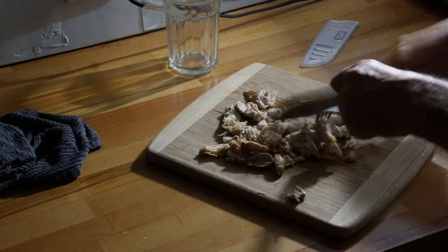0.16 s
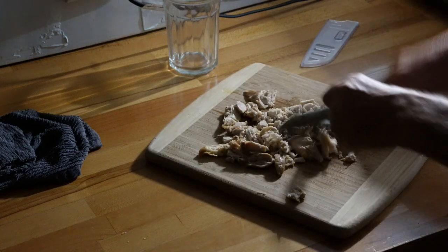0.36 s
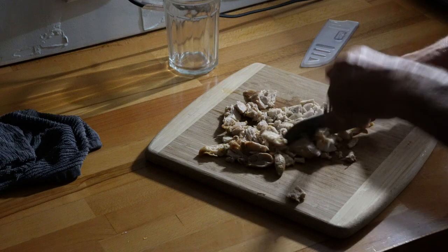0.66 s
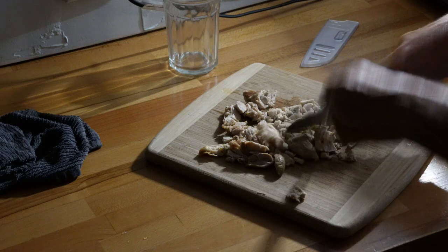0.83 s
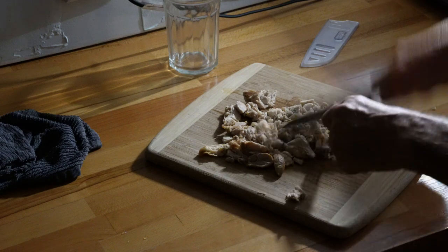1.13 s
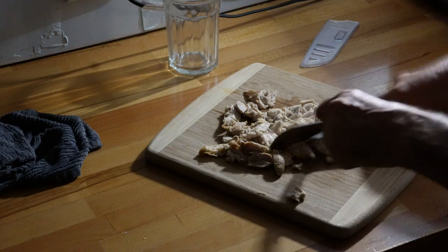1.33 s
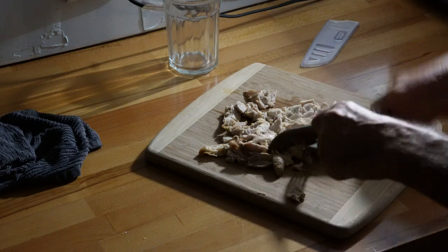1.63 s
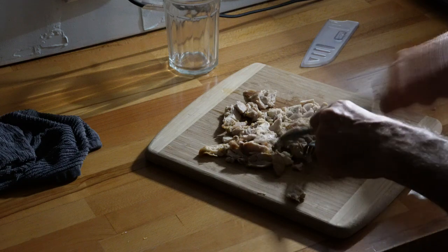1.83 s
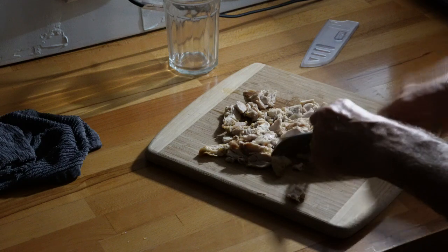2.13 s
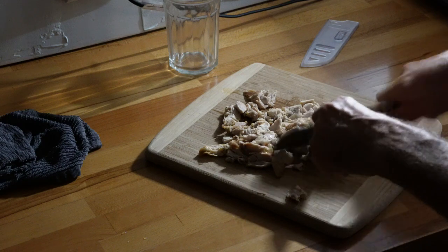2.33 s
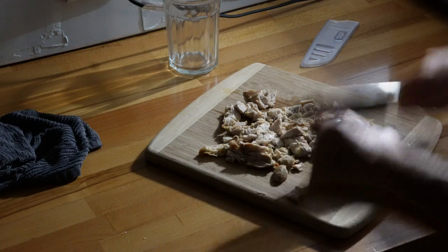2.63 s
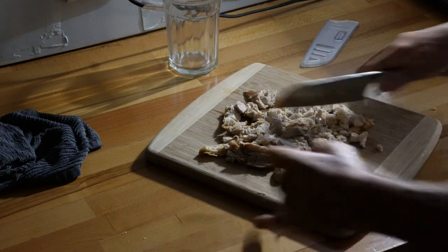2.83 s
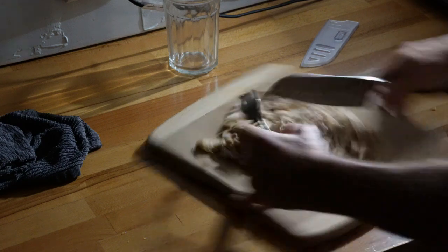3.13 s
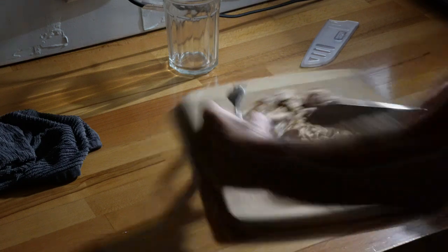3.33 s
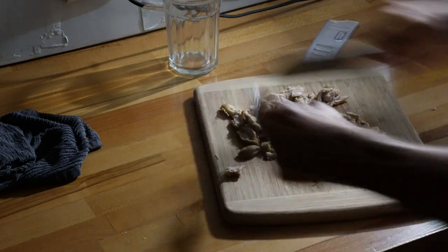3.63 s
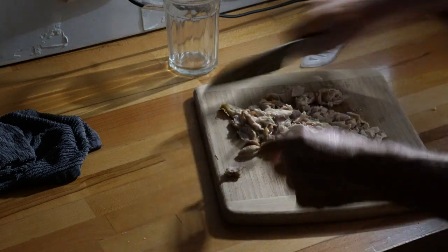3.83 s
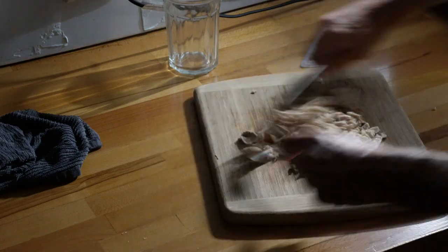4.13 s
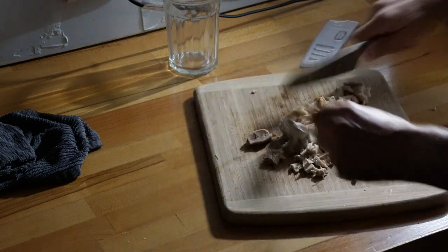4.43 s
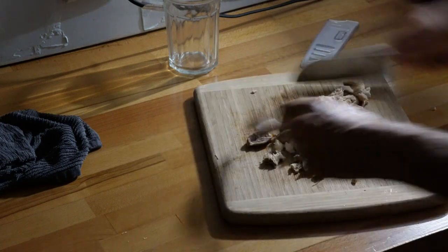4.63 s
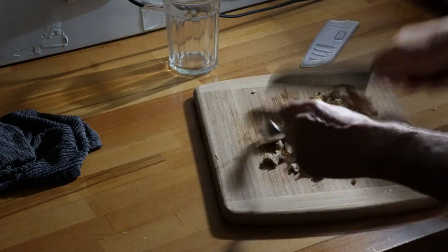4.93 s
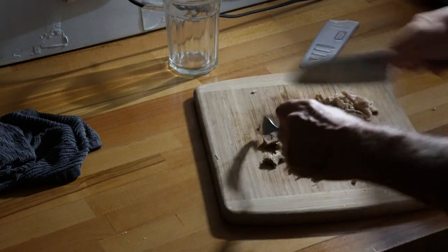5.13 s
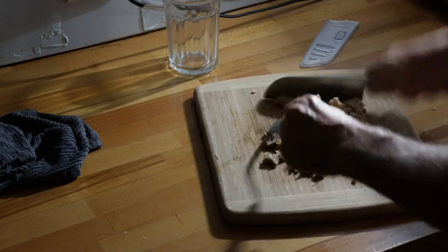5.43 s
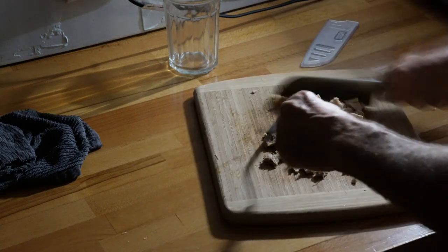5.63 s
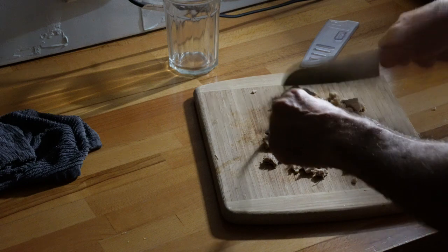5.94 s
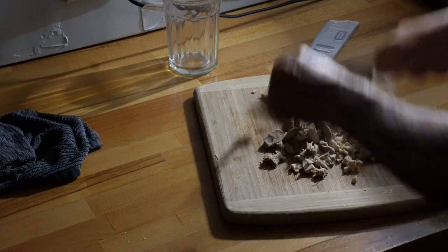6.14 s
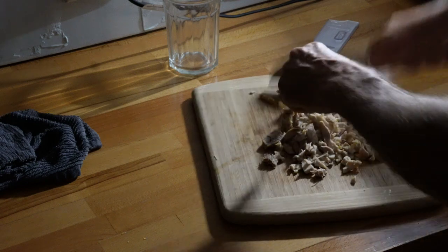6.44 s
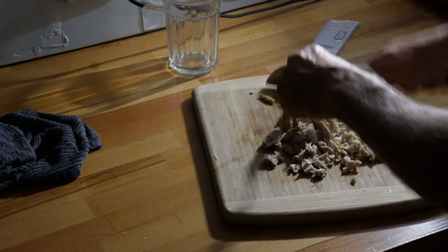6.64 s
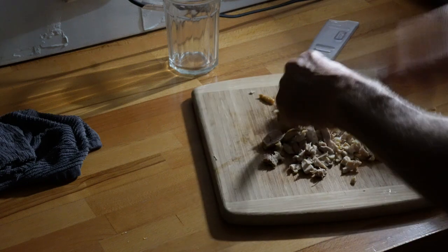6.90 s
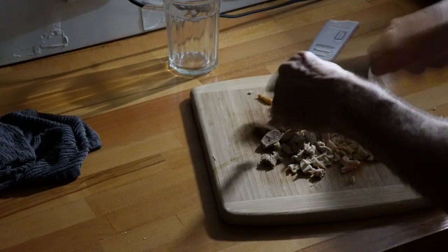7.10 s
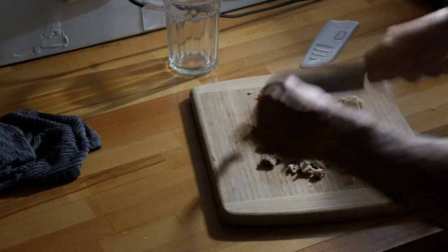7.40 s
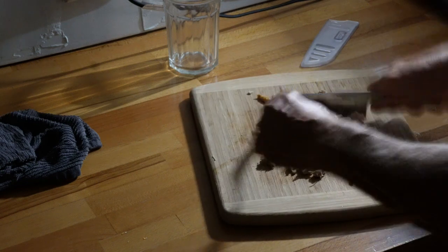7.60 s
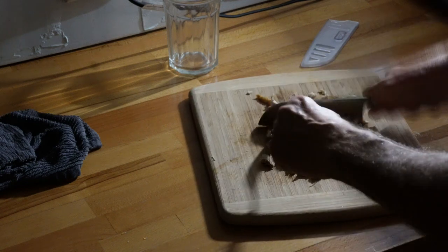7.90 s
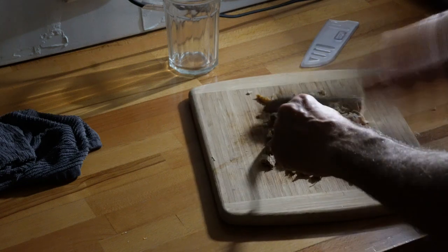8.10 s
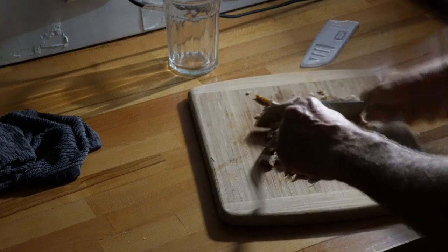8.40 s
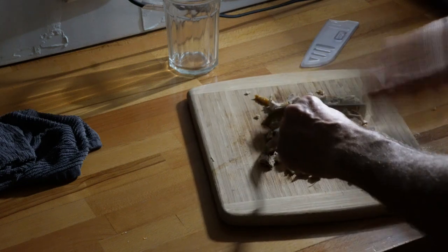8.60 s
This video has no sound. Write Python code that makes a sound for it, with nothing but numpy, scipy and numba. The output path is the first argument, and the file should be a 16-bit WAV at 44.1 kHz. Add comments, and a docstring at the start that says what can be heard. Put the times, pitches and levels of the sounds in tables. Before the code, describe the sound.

Close in a hard-walled kitchen with a low steady hum, a knife cuts cooked meat on a wooden board. One firm knock and a bright fork clink lead to soft, wet cuts. The board slides briefly, the blade scrapes with a thin metallic ring, and strokes resume unevenly. It finishes with a run of hard, regular woody chops, each with a counter thud and a short room echo.

```python
"""In a hard-walled kitchen with a humming appliance, a knife chops cooked chicken held by a fork on a wooden board.
Strokes knock the board (damped modes, noise bursts), thud into the counter and tear moist fibres (random snaps).
Early on, blade and fork clink; then the board slides round and the edge scrapes meat together (stick-slip).
A run of hard, even chops ends it. A close recorder's limiter squeezes loud blows, so the room swells behind."""
import sys
import numpy as np
from scipy import signal
from scipy.fft import rfft, irfft
from scipy.io import wavfile
from scipy.ndimage import uniform_filter1d, minimum_filter1d
from numba import njit

SR = 44100
rng = np.random.default_rng(int(sys.argv[2]) if len(sys.argv) > 2 else 0)


def dump_mix(stems):
    """Bounce the given channels to the path in sys.argv[1] as a 16-bit WAV at rate SR."""
    frames = np.atleast_2d(stems).T  # one column per channel
    limited = np.clip(frames, -1, 1)  # hard clip at full scale
    pcm = np.round(limited * 32767).astype(np.int16)
    wavfile.write(sys.argv[1], SR, pcm)


N = 386316
T = np.arange(N) / SR
HIT = T[:SR // 4]  # time axis of one contact, s
LEFT_RIGHT = np.array([[1], [-1]])

# Knife strokes. Each row: start in seconds, reference level of the board knock in dB, level of the edge's
# crack on bare wood in dB, level of tearing meat in dB, time until the fibres part in seconds.
STROKES = [(.181, -10.5, -25.5, -36, .032), (.838, -57, -57, -32, 0.062), (1.196, -44, -68, -36, .052),
           (1.525, -29.5, -43.5, -36.5, 0.041), (1.803, -49, -63, -37, .047),
           (2.069, -31.5, -46, -36.5, .033), (2.332, -16, -31.5, -55, 0.025),
           (3.850, -25.5, -18, -47, 0.047), (4.610, -19.5, -15, -41, .025), (5.153, -32, -58, -30, 0.14),
           (5.501, -25.5, -31.5, -32, 0.12), (5.893, -29, -36, -31, 0.046), (6.216, -11, -3.5, -46, 0.065),
           (6.5129, -8, -4.5, -49, 0.039), (6.823, -8, -19.5, -30, .048), (7.132, -4.5, -14, -35, 0.053),
           (7.439, -8, -20.5, -27, 0.036), (7.740, -4.5, -19, -28, 0.045), (8.028, -6.5, -25.5, -28, 0.04),
           (8.309, -6, -20, -35, 0.036), (8.586, -4, -20, -31.5, 0.04)]
# Stereo width of diffuse sound. Each row: frequency in Hz, side-to-mid level in dB.
SIDE_TO_MID = [(30, -18), (70, -37), (130, -60), (250, -28.5), (600, -17), (1400, -15), (3000, -9),
               (8000, -2.5), (14000, 1)]

CLING_HZ = 25  # meat clinging to the steel widens the modes of blade and fork
LEAD_S = 0.1  # fibres() peaks this long after its start
SMACK_RISE_S, SMACK_FALL_S, SMACK_TILT_DB_PER_OCT = 0.0023, 0.011, 3.5


def undb(db):
    """Decibels to gain."""
    return 10 ** (np.asarray(db) / 20)


def unit(x):
    """Scale to rms 1."""
    return x / np.sqrt(np.mean(x ** 2))


def blow(x, db):
    """Set the level that a blow would have with all its energy in 10 ms."""
    return x * undb(db) / np.sqrt(np.sum(x ** 2) / (SR / 100))


def add(track, start_s, x):
    """Mix x into the track from start_s on."""
    i = max(int(start_s * SR), 0)
    track[i:i + len(x)] += x[:max(N - i, 0)]


def read(points, hz):
    """Interpolate a table over log frequency."""
    table_hz, value = np.transpose(points)
    return np.interp(np.log(hz + 1), np.log(table_hz), value)


def colour(x, points, tilt_db_per_oct=0, size=8192):
    """Minimum-phase filter with the given dB spectrum, tilted per octave."""
    hz = np.arange(size // 2 + 1) * SR / size
    spectrum_db = read(points, hz) + tilt_db_per_oct * np.log2(1 + hz / 1000)
    # folding the cepstrum onto positive time makes the filter causal
    cepstrum = irfft(np.log(undb(spectrum_db)))
    cepstrum[1:size // 2] *= 2
    cepstrum[size // 2 + 1:] = 0
    impulse = irfft(np.exp(rfft(cepstrum)))
    return signal.oaconvolve(x, impulse)[:len(x)]


def ring(modes, tilt_db_per_oct=0, scatter_db=0, detune=0):
    """Damped modes after one push; their sizes depend on the point of contact."""
    hz, width_hz, db = np.transpose(modes)[:, :, None]
    size, shift = rng.standard_normal((2, len(modes), 1))
    mode_db = db + tilt_db_per_oct * np.log2(hz / hz[0]) + scatter_db * size
    gain = undb(mode_db) * np.sqrt(width_hz)
    sign = (-1) ** np.arange(len(modes))[:, None]
    decay = np.exp(-np.pi * width_hz * HIT)
    tone = np.sin(2 * np.pi * hz * (1 + detune * shift) * HIT)
    return np.sum(sign * gain * decay * tone, axis=0)


def burst(rise_s, fall_s):
    """Rough contact: micro-impacts that build and die within milliseconds and favour no pitch."""
    shape = (1 - np.exp(-HIT / rise_s)) * np.exp(-HIT / fall_s)
    spray = rng.standard_normal(len(HIT)) * shape
    for _ in range(3):
        # flatten the spectrum, then restore the shape in time
        flat = irfft(np.exp(1j * np.angle(rfft(spray))), len(HIT))
        spray = flat * np.sqrt(shape)
    return spray


def grains(n, rate_hz, spread_db):
    """Tiny slips and snaps at random moments, of widely varied size, at rms 1."""
    size = undb(spread_db * np.minimum(rng.exponential(size=n), 4))
    present = rng.random(n) < rate_hz / SR
    return unit(present * size * rng.standard_normal(n))


def flicker(n, rate_hz):
    """Random wander between normal-distributed knots, spread near 1."""
    knots = np.arange(n) * rate_hz / SR
    return np.interp(knots, np.arange(200), rng.standard_normal(200))


def push(t, length_s, attack_s, press_db, release_s):
    """Gain of a sliding push from t = 0: takes hold, grows by press_db over its length, lets go."""
    hold = 1 - np.exp(-np.maximum(t, 0) / attack_s)
    press = undb(press_db * np.minimum(t / length_s - 1, 0))
    release = np.exp(-np.maximum(t - length_s, 0) / release_s)
    return hold * press * release


def fibres(db, rise_s, fall_s, tilt_db_per_oct):
    """Moist fibres snap ever harder up to a peak at LEAD_S, then let go."""
    # Spectrum of tearing meat. Each row: frequency in Hz, level in dB before tilt.
    meat_spectrum = [(200, -7), (800, 8.5), (2000, 6.5), (4000, 2), (6500, 0.5), (8500, -5), (12000, -8),
                     (16000, -15)]
    t = HIT - LEAD_S
    snaps = grains(len(t), rate_hz=6000, spread_db=2.5)
    crackle = unit(colour(snaps, meat_spectrum, tilt_db_per_oct))
    return undb(db) * crackle * np.exp(np.minimum(t / rise_s, -t / fall_s))


def background():
    """Motor hum, its partials unsteady in phase, over diffuse air noise."""
    # Appliance hum. Each row: frequency in Hz, rms level in dB before a common 1 dB cut.
    hum_partials = [(59.2, -51.5), (118.4, -47.5), (172.3, -48), (231.5, -49), (290.7, -55.5),
                    (328.4, -65.5), (829.0, -60.5)]
    # Room air noise. Each row: frequency in Hz, relative density in dB per Hz.
    air_spectrum = [(15, -27), (25, -33), (49, -2.5), (123, -5.5), (145, -3), (217, -3.5), (263, -7.5),
                    (335, -9), (416, -14.5), (714, -23.5), (796, -18), (1160, -25.5), (1480, -24.5),
                    (8590, -43), (16000, -62)]
    mid, side = (unit(colour(rng.standard_normal(N), air_spectrum)) for _ in range(2))
    hum = 0
    for hz, db in hum_partials:
        wander = np.cumsum(rng.standard_normal(N)) / np.sqrt(SR)
        phase = 2 * np.pi * (hz * T + rng.random()) + 1.07 * wander
        hum = hum + undb(db - 1) * np.sqrt(2) * np.sin(phase)
    air_db = -38.5
    return hum + undb(air_db) * (mid + LEFT_RIGHT * colour(side, SIDE_TO_MID))


def kitchen(x, room_db, gap_s, build_s):
    """Direct sound and dense wall and counter echoes; bass lasts longest, treble is widest."""
    # Reverberation. Each row: frequency in Hz, 60 dB decay time in seconds.
    room_decay = [(150, 1), (500, 0.63), (1000, 0.6968), (1900, 0.84), (3000, 0.66), (5000, 0.74),
                  (8000, .5), (13000, 0.61)]
    t = T[:SR]
    hz = np.arange(SR // 2 + 1.)
    octave = np.log2(np.clip(hz, 125, 16000) / 125)
    noise, tail = rfft(rng.standard_normal((2, SR))), 0
    for k in np.arange(8):
        t60_s = read(room_decay, 125 * 2 ** k)
        band = irfft(noise * np.maximum(1 - abs(octave - k), 0), SR)
        tail = tail + band * np.exp(-np.log(1000) * t / t60_s)
    onset = 1 - np.exp(-np.maximum(t - gap_s, 0) / build_s)
    mid, side = undb(room_db) * tail * onset / np.sqrt(np.sum(tail[0] ** 2))
    mid[0] += 1  # the direct path
    # even out narrow peaks and dips of the echo, so the board's own modes set the pitch
    power = abs(rfft(mid)) ** 2
    ripple_db = 10 * np.log10(uniform_filter1d(power, size=30) / uniform_filter1d(power, size=1500))
    even_mid = colour(mid, np.column_stack([hz + 1, -ripple_db]))
    response = even_mid + LEFT_RIGHT * colour(side, SIDE_TO_MID)
    return signal.fftconvolve(x[None], response, axes=1)[:, :N]


def board_turn():
    """The board slides softly over the counter in one push, catching on crumbs."""
    # Spectrum of the sliding board. Each row: frequency in Hz, level in dB.
    slide_spectrum = [(200, -13), (1000, -0.5), (2500, 3), (6500, -3), (9000, -15.5), (15000, -30)]
    rub = grains(N, rate_hz=4000, spread_db=-0.5) * undb(2.9 * flicker(N, rate_hz=17))
    pressure = push(T - 2.996, length_s=0.27, attack_s=0.022, press_db=6, release_s=0.045)
    return undb(-44.5) * unit(colour(rub, slide_spectrum)) * pressure


def clinks():
    """Steel grazes steel and rings the fork, which the meat soon damps."""
    # Fork modes. Each row: frequency in Hz, width in Hz before clinging meat, level in dB before tilt.
    fork_modes = [(1900, 160, -9.5), (2620, 110, -9.5), (3394, 100, -2), (3505, 53, -2), (3760, 41, -4),
                  (4120, 110, -6), (4750, 150, -19), (7130, 26, 2), (7370, 150, -3.5), (7900, 27, -1),
                  (8800, 74, -4), (9860, 150, -8), (11400, 25, -4.5), (11100, 140, -27), (13700, 130, -24),
                  (15100, 90, -23)]
    # Blade on fork. Each row: start in seconds, graze level in dB, tilt in dB per octave.
    fork_contacts = [(.4745, -25, -2.5), (.509, -33, -1), (.529, -34, 3), (6.645, -42.5, 4)]
    # graze spectrum: Hz, dB before tilt
    graze_spectrum = [(500, -28), (1700, -2), (3700, -1.0), (7000, 4.5), (16000, 0.5)]
    damped_fork = np.add(fork_modes, [0, CLING_HZ, 0])
    out = np.zeros(N)
    for start_s, db, tilt_db_per_oct in fork_contacts:
        contact = burst(rise_s=0.002, fall_s=0.007)
        graze = colour(contact, graze_spectrum, tilt_db_per_oct)
        fork = ring(damped_fork, tilt_db_per_oct)
        add(out, start_s, blow(fork, db + 2) + blow(graze, db))
    return out


def scrapes():
    """The edge sticks and slips over the wood grain and sets the blade singing: tip first, then heel."""
    # Pushes of the edge. Each row: start in seconds, length in seconds, friction level in dB,
    # steel ring level in dB (both before the push gain), contact from tip 0 to heel 1.
    edge_pushes = [(3.856, 0.12, -39, -29, 0.068), (3.998, .12, -39.5, -32, 0.042),
                   (4.61, 0.019, -28, -38, 1), (4.675, 0.092, -28.5, -27.5, 0.7)]
    # Blade modes. Each row: frequency in Hz, width in Hz before clinging meat, level in dB on the tip,
    # level in dB on the heel.
    blade_modes = [(2730, 110, -1, -27), (3257, 27, 2, 1.5), (3435, 90, 0, -10), (4100, 130, -5, -5),
                   (4773, 71, -2.5, 7), (5920, 84, 1, -7), (7150, 380, -2, -9), (8730, 680, -0.5, -11),
                   (9930, 59, -8, -6), (10680, 77, -9, -8), (11860, 44, -11, 4), (12900, 130, -11, -12),
                   (13500, 1500, -20, -6), (14300, 200, -17, -10), (15400, 220, -18, -22)]
    # Spectrum of the scraping edge. Each row: frequency in Hz, level in dB.
    edge_spectrum = [(100, -2), (400, 6.5), (1000, 8.5), (3000, -1.5), (5000, -6.5), (7000, -6),
                     (9000, -20), (16000, -17)]
    out = np.zeros(N)
    hz, width_hz, tip_db, heel_db = np.transpose(blade_modes)
    for start_s, length_s, friction_db, steel_db, heel in edge_pushes:
        slips = grains(len(HIT), rate_hz=3000, spread_db=3) * undb(2.5 * flicker(len(HIT), rate_hz=90))
        mode_db = tip_db + heel * (heel_db - tip_db)
        steel = 0
        for mode in np.column_stack([hz, width_hz + CLING_HZ, mode_db]):
            # as the contact point travels, each mode is driven now more, now less
            drive = undb(4 * flicker(len(HIT), rate_hz=30))
            steel = steel + signal.fftconvolve(slips * drive, ring([mode]))[:len(HIT)]
        pressure = push(HIT, length_s, attack_s=0.0026, press_db=5.5, release_s=0.011)
        friction = undb(friction_db) * unit(colour(slips, edge_spectrum))
        add(out, start_s, pressure * (friction + undb(steel_db) * unit(steel)))
    return out


def meat():
    """Steel smacks the wet surface, then tears through; now and then meat peels off the steel."""
    # Sticky meat leaving the steel. Each row: time of the peak in seconds, level in dB.
    peel_events = [(1.378, -55), (1.42, -52), (1.466, -48), (2.518, -56), (5.913, -42)]
    out = np.zeros(N)
    for start_s, knock_db, crack_db, tear_db, cut_s in STROKES:
        smack_db = -41.5 + 0.18 * max(knock_db, crack_db)
        smack = fibres(smack_db, SMACK_RISE_S, SMACK_FALL_S, SMACK_TILT_DB_PER_OCT)
        add(out, start_s - LEAD_S, smack)
        # the slower the cut, the longer the tear
        tear = fibres(tear_db, rise_s=0.16 * cut_s, fall_s=0.16 * cut_s, tilt_db_per_oct=-1)
        add(out, start_s + cut_s - LEAD_S, tear)
    for peak_s, db in peel_events:
        peel = fibres(db, SMACK_RISE_S, SMACK_FALL_S, SMACK_TILT_DB_PER_OCT)
        add(out, peak_s - LEAD_S, peel)
    return out


def chops():
    """The edge cracks on the wood, the board rings and the counter thuds below it."""
    # Board modes, which change with its lie on the counter. Each row: frequency in Hz, width in Hz,
    # level in dB before the board is turned, level in dB after; levels before tilt.
    board_modes = [(390, 70, -25, -29), (484.5, 25, -8, -3.5), (534.4, 25, -7.5, -3.5), (666, 17, -18, -19),
                   (718, 7.8, -10, -2.5), (803, 34, -2.5, 0.5), (853, 47, -2, -4), (995.3, 24.4, 0, 1.5),
                   (1180, 130, -2, -7), (1240, 170, -1.5, -11), (1325, 200, -9, -11.5),
                   (1442, 270, -14.5, -11.5), (1920, 52, -22, -8), (1935, 31, -16.5, -3),
                   (2080, 240, -39, -10.5)]
    # Spectrum of the wood's dense modes. Each row: frequency in Hz, level in dB before tilt.
    wood_spectrum = [(200, -16), (450, -7.5), (700, 0), (850, 6.5), (1100, 3), (1400, -5), (2100, -9.5),
                     (2800, -31.5), (3500, -20.5), (4600, -23.5), (5500, -35.5), (7500, -41.5),
                     (10000, -46), (16000, -66)]
    # Spectrum of the crack. Each row: frequency in Hz, level in dB.
    crack_spectrum = [(100, -57), (300, -2.5), (450, 0.5), (600, -21.5), (770, 2.5), (1150, -2.5),
                      (1700, 1.5), (2900, 1), (3300, -11.5), (4200, -8.5), (5000, -15), (7200, -19),
                      (9000, -32.5), (16000, -45)]
    # Spectrum of the counter thud. Each row: frequency in Hz, level in dB.
    thud_spectrum = [(25, -49), (50, -24), (90, -26), (130, -6), (190, -1), (290, -11), (420, -7.5),
                     (700, -28.5), (2000, -61)]
    turned_s = 3.5
    out = np.zeros(N)
    hz, width_hz, before_db, after_db = np.transpose(board_modes)
    for start_s, knock_db, crack_db, tear_db, cut_s in STROKES:
        force_db = max(knock_db, crack_db)
        bareness_db = crack_db - knock_db
        thud_db = -17.5 + 0.5 * force_db
        # the knock brightens with force and with bare contact
        tilt_db_per_oct = 4.0 + 0.079 * force_db + 0.2 * bareness_db
        modes = np.column_stack([hz, width_hz, after_db if start_s > turned_s else before_db])
        # hand and meat press on the board and shorten its ring
        knock = ring(modes, tilt_db_per_oct, scatter_db=0.8, detune=0.002) * np.exp(-HIT / 0.03)
        # many overlapping modes fill in between the clear ones
        wood = colour(burst(rise_s=0.0039, fall_s=0.0097), wood_spectrum, tilt_db_per_oct)
        crack = colour(burst(rise_s=0.00085, fall_s=0.0087), crack_spectrum)
        thud = colour(burst(rise_s=0.0046, fall_s=0.035), thud_spectrum)
        board = blow(knock, knock_db - 0.4) + blow(wood, knock_db - 2.5)
        add(out, start_s, board + blow(crack, crack_db) + blow(thud, thud_db))
        # the board chatters briefly on the counter
        chatter = colour(burst(rise_s=0.0044, fall_s=0.017), wood_spectrum, tilt_db_per_oct)
        add(out, start_s + 0.012, blow(chatter, knock_db - 10.0))
        # the edge settles on the wood as the last fibres part
        add(out, start_s + cut_s, blow(wood, tear_db - 10.5))
    return out


def scene():
    """Knife work close by, its echo and the hum behind it."""
    close = board_turn() + clinks() + scrapes() + meat() + chops()
    return kitchen(close, room_db=-4.0, gap_s=0.0018, build_s=0.00019) + background()


@njit
def follow(size, attack, release):
    """Peak follower with one smoothing factor for rises and one for falls."""
    out, level = np.empty(len(size)), 0.
    for i in range(len(size)):
        level += (size[i] - level) * (attack if size[i] > level else release)
        out[i] = level
    return out


def limiter(x, top_db, release_s):
    """Look a millisecond ahead, turn down whatever exceeds the ceiling, then recover."""
    peak = follow(np.abs(x).max(axis=0), 1., 1 - np.exp(-1 / (release_s * SR)))
    gain = 1 / np.maximum(peak / undb(top_db), 1)
    return x * uniform_filter1d(minimum_filter1d(gain, size=45), size=45)


def record(dry):
    """The recorder limits the hard blows and cuts the top above 15.8 kHz."""
    held = limiter(dry, top_db=-3, release_s=0.0098)
    low_pass = signal.ellip(10, 0.2, 80, 15800, fs=SR, output="sos")
    return signal.sosfilt(low_pass, held)


dry = scene()
out = record(dry)
dump_mix(out)
```